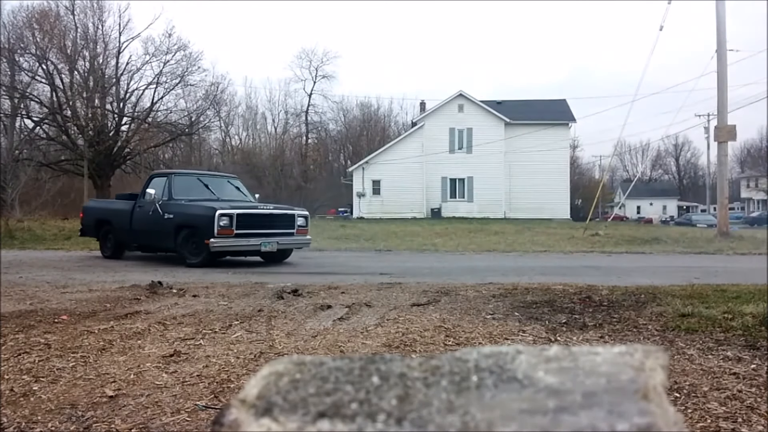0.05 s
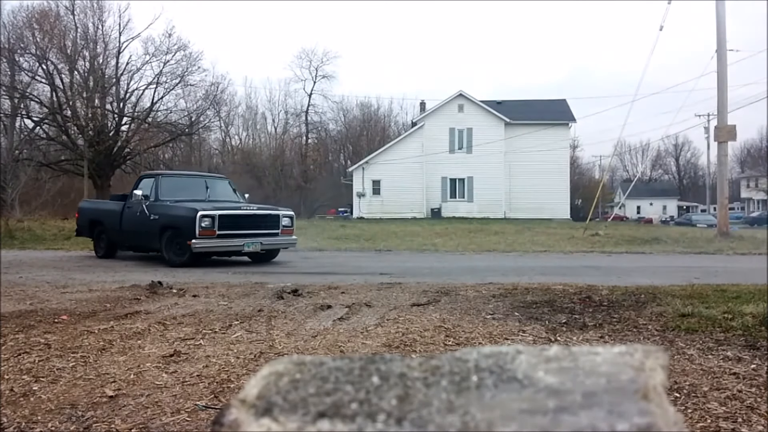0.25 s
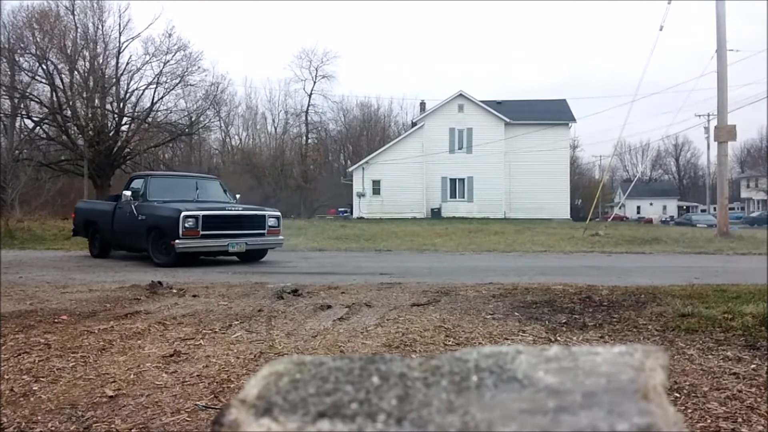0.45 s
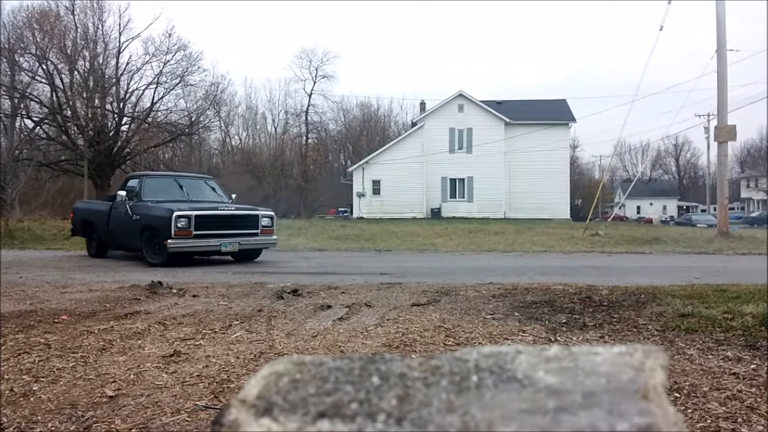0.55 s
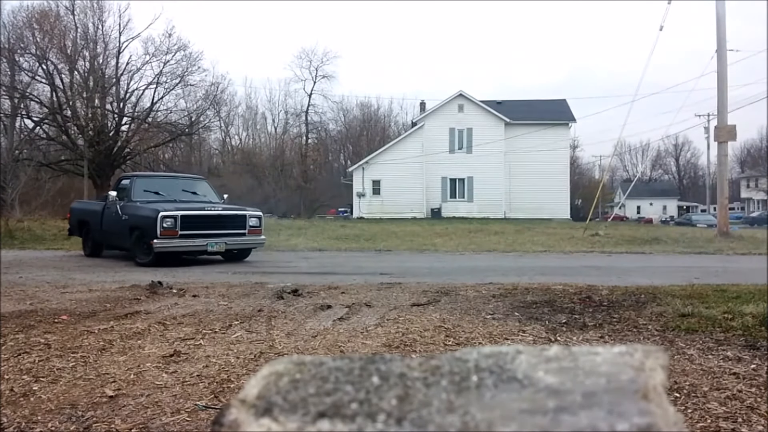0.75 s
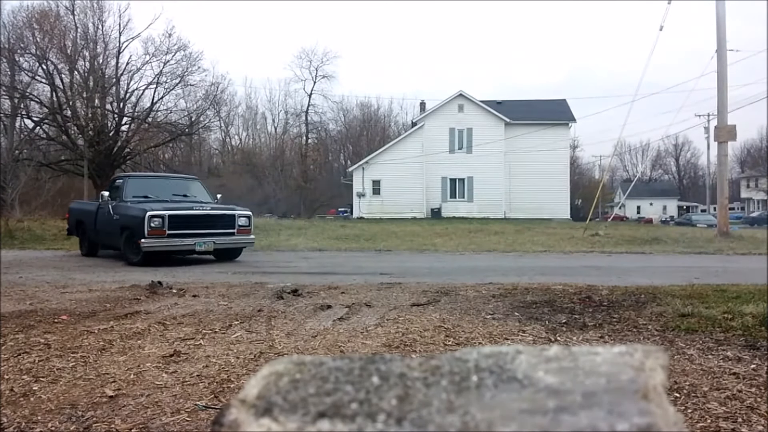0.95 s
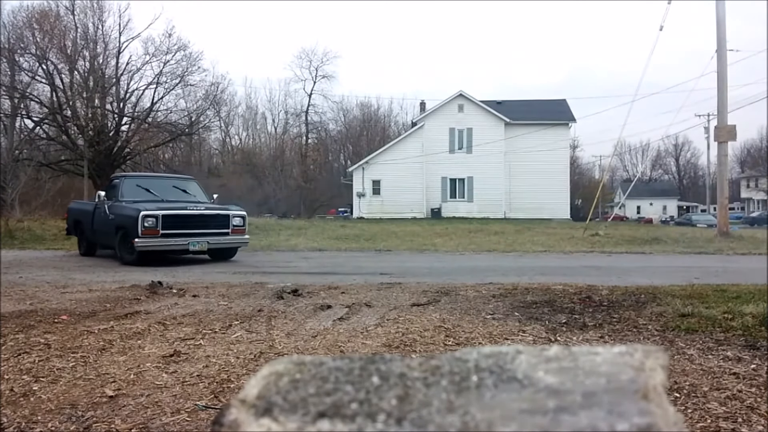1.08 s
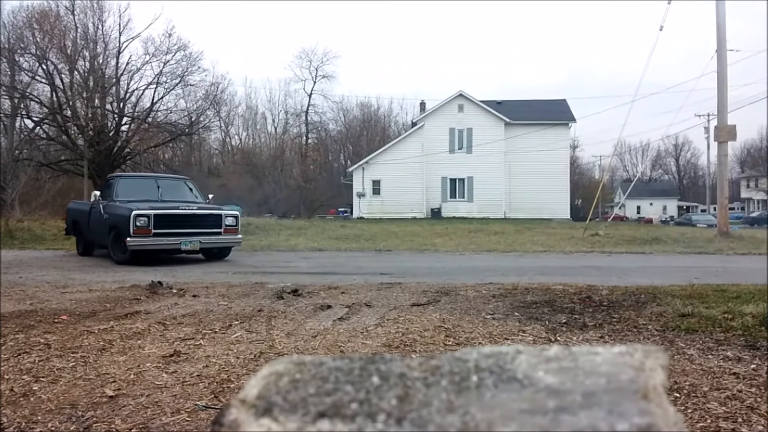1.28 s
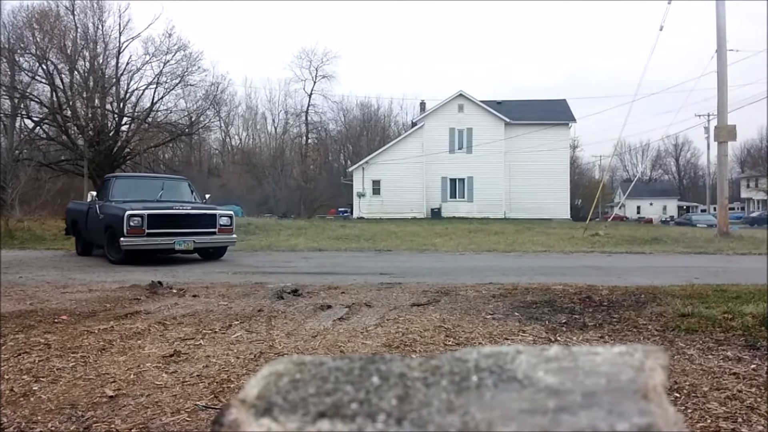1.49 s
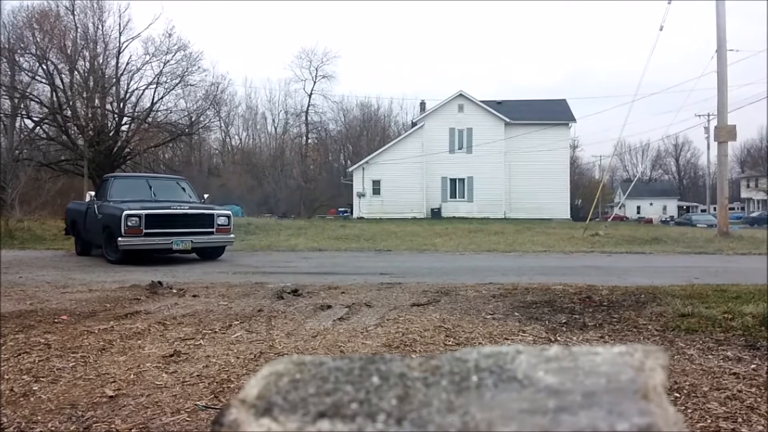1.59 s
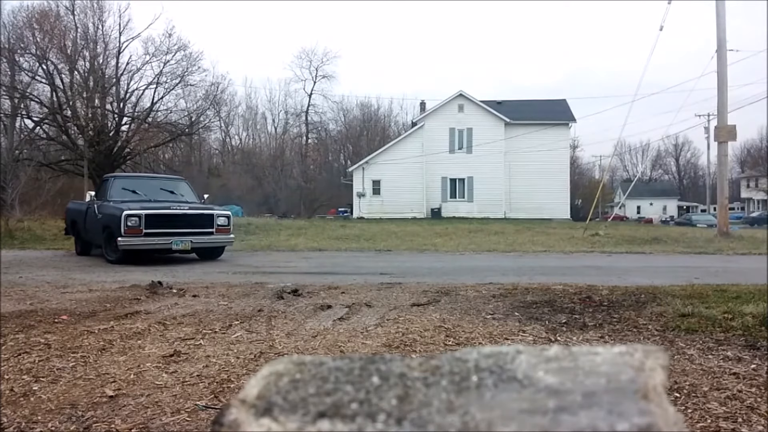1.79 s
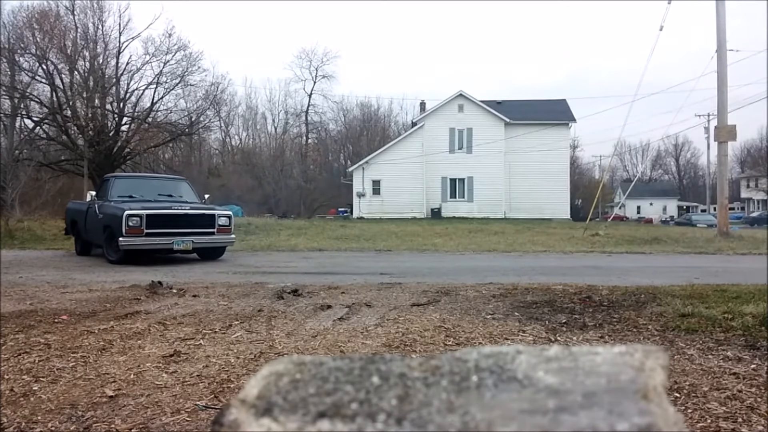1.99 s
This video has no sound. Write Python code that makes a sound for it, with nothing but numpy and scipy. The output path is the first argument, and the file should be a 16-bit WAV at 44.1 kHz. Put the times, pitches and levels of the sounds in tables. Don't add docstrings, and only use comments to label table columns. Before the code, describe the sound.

Lumpy low truck engine rumble through open pipes, with irregular louder barks, belt chirps, loose panel rattles and metal ticks; outdoor stereo pickup at a distance, left-weighted, with a dull clunk and wind buffet late on.

```python
import sys
import numpy as np
from scipy import signal
from scipy.fft import rfft, irfft, next_fast_len
from scipy.io import wavfile
from scipy.ndimage import uniform_filter1d, map_coordinates

SR = 44100
rng = np.random.default_rng(int(sys.argv[2]) if len(sys.argv) > 2 else 0)


def to_wav(s):
    ch = np.atleast_2d(s).T
    pcm = np.round(np.clip(ch, -1, 1) * 32767)
    wavfile.write(sys.argv[1], SR, pcm.astype(np.int16))


def decibels_to_gain(level_db):
    exponent = np.asarray(level_db, float) / 20
    return 10 ** exponent


N = 89875

# [t/s, level/dB]
LOUD_FIRINGS = [(-0.0177, 4.6), (0.0168, 11.5), (0.0939, 6.4), (0.1175, -2.1), (0.1329, -2.6),
                (0.1669, 11.4), (0.2122, 11.8), (0.2263, 4.3), (0.2902, 2.1), (0.3166, 7.0), (0.3478, 1.8),
                (0.3633, 10.2), (0.4086, 12.8), (0.4222, -1.6), (0.4857, 6.5), (0.5224, 2.3), (0.5592, 8.8),
                (0.5791, 2.2), (0.6045, 10.3), (0.6544, 0.4), (0.707, 1.3), (0.7524, 11.8), (0.7741, 5.4),
                (0.7964, 15.0), (0.8195, 4.0), (0.8313, 0.7), (0.854, 6.7), (0.8766, -1.2), (0.8948, 1.0),
                (0.9383, 7.6), (0.981, 5.1), (0.9973, 1.7), (1.0154, 4.9), (1.0304, -1.7), (1.1143, 10.7),
                (1.1315, -1.3), (1.171, 7.0), (1.2, 0.7), (1.2299, 4.5), (1.2676, 10.1), (1.2857, 3.9),
                (1.3252, 8.2), (1.3542, -2.4), (1.3837, 2.6), (1.4218, 7.3), (1.4385, -0.5), (1.5143, -0.4),
                (1.5488, -3.0), (1.5841, 0.5), (1.6281, 9.2), (1.7315, 7.6), (1.7814, 7.2), (1.8168, 1.4),
                (1.8576, 2.8), (1.9075, 2.7), (1.9338, 3.3), (1.9814, 6.6), (2.0168, 4.8)]
CYCLE_STARTS = [-.18, .017, .212, .409, .605, .796, .96, 1.114, 1.268, 1.422, 1.59, 1.765, 1.945, 2.13]
CYLINDER_LEVELS = [-14, 0, -2, -14, -1, 1, -14, -2]
# [f/Hz, width/Hz, level/dB]
PIPE_RESONANCES = [(82.7, 7.1, 0), (113.8, 14, 1.7), (188, 14, -8), (255, 25, -7), (306, 20, -3)]
# [t/s, peak level/dB, f/Hz]
EXHAUST_BURBLES = [(.10, -47, 263), (.19, -29, 278), (.265, -36, 235), (.33, -40, 208.5),
                   (.405, -42.5, 309), (.53, -38, 383), (.60, -36.5, 275.5), (.675, -39, 254.5),
                   (.745, -37, 347), (.815, -37.5, 386), (.95, -49.5, 284.7), (1.013, -40, 301),
                   (1.11, -32, 343.4), (1.276, -42, 306), (1.545, -32.5, 210), (1.607, -35, 235),
                   (1.678, -34, 468), (1.934, -43, 231), (1.075, -22, 55), (1.29, -33, 50), (1.39, -33, 52)]

# [t/s, level/dB]
CLATTER_LEVEL = [(0, -36.5), (.45, -42.5), (.63, -39), (1.0, -40.5), (1.27, -41), (1.58, -41.5),
                 (1.7, -43.5), (1.87, -43), (2.04, -45.5)]
# [t/s, level/dB]
GRIT_LEVEL = [(0, -50), (.14, -54.5), (.55, -56), (.63, -47), (.72, -53.5), (.92, -57), (1.08, -58),
              (1.13, -49), (1.28, -53), (1.54, -60.5), (1.66, -65.5), (1.72, -52.5), (2.04, -60.5)]
# [f/Hz, level per Hz/dB]
ROAR_COLOUR = [(15, -36), (28, -8), (45, -20), (100, -2.5), (150, -5), (210, -20), (400, -22.5),
               (800, -33.5), (1400, -39), (2200, -120)]
# [f/Hz, level per Hz/dB]
CLATTER_COLOUR = [(240, -19.5), (450, -7), (740, -7), (1220, -2), (1500, -4), (2400, -5), (3200, -9),
                  (3800, -5.5), (5200, -31.5), (7000, -23), (11000, -120)]
# [f/Hz, level per Hz/dB]
HISS_COLOUR = [(3000, -47), (4800, 9), (6100, -1), (7600, 3), (9500, -1), (11500, -9.5), (13500, -14),
               (15700, -45)]
# [f/Hz, likeness 0..1]
LEFT_RIGHT_LIKENESS = [(30, 0.25), (90, 0.95), (400, 0.61), (1500, 0.52), (3000, 0.4), (5000, 0.14),
                       (9000, 0.097)]
# [t/s, share 0..1]
GROUND_ECHO = [(.85, 0), (1.02, .6), (1.15, 0), (1.42, 0), (1.48, .85), (1.69, .9), (1.72, 0)]

# [t/s, peak level/dB, f/Hz]
LOW_RUBS = [(0.163, -32, 1192), (0.2379, -43, 1235), (0.3601, -29, 1166), (0.4349, -38, 1210),
            (0.4818, -42.5, 1195), (0.6125, -32.5, 1227), (0.7562, -28.5, 1205), (0.843, -41.5, 1229),
            (0.9383, -34.5, 1243), (1.0296, -39, 1228), (1.1707, -35.5, 1253), (1.261, -34, 1208),
            (1.5838, -38.5, 1213), (1.68, -41.5, 1214), (1.78, -40, 1190), (1.86, -39.5, 1282),
            (1.895, -38.5, 1235)]
MID_RUBS = [(0.268, -34.5, 2753), (0.46, -29, 2807), (0.56, -36, 2860), (0.618, -32, 2938),
            (0.7285, -45, 2780), (0.7968, -30, 2737), (0.8825, -30, 2680), (0.9497, -38, 2112),
            (1.0266, -39, 2170), (1.0974, -31.5, 2400), (1.1294, -30.5, 2265), (1.1982, -33.5, 2309),
            (1.3242, -32.5, 3010), (1.3573, -35.5, 2460), (1.3967, -34.5, 2747), (1.4936, -32.5, 2833),
            (1.5748, -30, 2594), (1.6841, -40, 2240), (1.7659, -36.5, 2710), (1.8018, -33.5, 2297),
            (1.8332, -39, 2757), (1.928, -35, 2960), (2.0188, -32.5, 2880)]
HIGH_RUBS = [(0.1695, -31.5, 3515), (.40, -41.5, 3500), (0.4614, -34, 3670), (0.5482, -31, 3770),
             (0.619, -34, 3377), (0.7257, -35.5, 3585), (0.9837, -47, 3700), (1.0934, -36.5, 3400),
             (1.1907, -37.5, 3323), (1.3992, -29, 3628), (1.4955, -34, 3530), (1.6711, -36.5, 3810),
             (1.7594, -35, 3610), (1.941, -50, 3600), (2.0213, -50, 3510)]
# [t/s, peak level/dB, f/Hz]
PANEL_RATTLES = [(0.022, -36, 684), (0.067, -35, 623), (0.143, -44, 608), (0.284, -32.5, 777),
                 (0.413, -29, 771), (0.468, -28, 883), (0.721, -47, 1036), (0.858, -34, 960),
                 (1.056, -33, 883), (1.42, -24.5, 707), (1.54, -32, 603), (1.715, -36, 575)]
PANEL_BUZZES = [(0.1077, -34.5, 1817), (0.161, -34, 1710), (0.2519, -30, 1385), (0.386, -32, 1900),
                (0.4676, -27.5, 1329), (0.6387, -28.5, 1987), (0.7346, -28.5, 1570), (0.9512, -44.5, 1286),
                (1.1482, -36, 1393), (1.2636, -29.5, 1508), (1.414, -38, 1914), (1.754, -34.5, 1478),
                (1.8602, -32, 1319), (1.9023, -35.5, 1404)]
# [t/s, length/s, level/dB, start f/Hz, end f/Hz]
BELT_SLIPS = [
    (.17, .17, -40, 3650, 3400),
    (.325, .068, -34, 3400, 3260),
    (.275, .044, -41, 3600, 3750),
    (1.772, .13, -43, 3700, 4000),
    (.447, .014, -60, 15400, 15400),
]
# [t/s, peak level/dB]
GEARBOX_BLOWS = [
    (1.4185, -26),
    (1.428, -23.5),
    (1.437, -31.5),
    (1.446, -27),
]
# [f/Hz, level/dB, time to die by 60 dB/s]
GEARBOX_RINGING = [(310, -6, .08), (575, -8, .04), (690, -4, .045), (770, -7, .03), (835, -4, .04),
                   (965, -8, .035)]
# [t/s, peak level/dB, f/Hz]
LINKAGE_TICKS = [(.17, -31, 3940), (.264, -34, 4470), (.468, -27, 990), (.6188, -18.5, 3900),
                 (.6407, -26, 4000), (.653, -30, 3800), (.68, -25, 4200), (.787, -35, 4530),
                 (.985, -36, 3500), (1.099, -33, 5000), (1.129, -29, 2900), (1.4945, -32, 3100),
                 (1.575, -29, 2900), (2.021, -29, 3000)]

# [t/s, peak level/dB, f/Hz]
GUST_PUSHES = [
    (1.6915, -4, 195),
    (1.697, -4, 90),
    (1.7075, -13, 110),
    (1.7174, -6, 165),
    (1.7362, -5, 92),
]
# [f/Hz, level/dB]
LEFT_OVER_RIGHT = [(60, 0), (160, 7), (350, 3), (700, 5), (1400, 4.5), (3200, 9.5), (5000, 9), (7500, 5)]


def unit(x):
    return x / np.sqrt(np.mean(x ** 2) + 1e-20)


def along(points, hz):
    f, v = np.transpose(points)
    return np.interp(np.log(hz + 1), np.log(f + 1), v)


def over_time(points):
    return np.interp(np.arange(N) / SR, *np.transpose(points))


def wobble(rate):
    knots = rng.standard_normal(int(N * rate / SR) + 4)
    return map_coordinates(knots, [np.arange(N) * rate / SR])


def filtered(x, response):
    m = next_fast_len(x.shape[-1] + SR)
    return irfft(rfft(x, m) * response(np.fft.rfftfreq(m, 1 / SR)), m)[..., :x.shape[-1]]


def peak(f, hz, width):
    return 1j * f * width / (hz * hz - f * f + 1j * f * width)


def blank(seconds):
    return np.zeros(N + SR), np.arange(int(seconds * SR)) / SR


def lay(track, s, sound):
    track[max(round(s * SR), 0):][:len(sound)] += sound


def firings():
    k = np.arange(8 * (len(CYCLE_STARTS) - 1))
    even = np.interp(k / 8, np.arange(len(CYCLE_STARTS)), CYCLE_STARTS)
    return even + .0015 * rng.standard_normal(len(k))


def exhaust(times):
    quiet_db, scatter_db, bark_db = -52, 2, -39.4
    hump_hz, hump_width_hz = 79, 80
    far_delay_s, far_share = .0272, .49
    lead = SR // 4
    pulses = np.zeros(N + 2 * lead)
    scatter = scatter_db * rng.standard_normal(len(times))
    size = decibels_to_gain(quiet_db + np.resize(CYLINDER_LEVELS, len(times)) + scatter)
    np.add.at(pulses, (times * SR).astype(int) + lead, size)
    for s, db in LOUD_FIRINGS:
        pulses[round(s * SR) + lead] += decibels_to_gain(db + bark_db)

    def pipes(f):
        ringing = sum(decibels_to_gain(db) * peak(f, hz, width) for hz, width, db in PIPE_RESONANCES)
        both_pipes = 1 + far_share * np.exp(-2j * np.pi * f * far_delay_s)
        return -2000 * ringing * peak(f, hump_hz, hump_width_hz) ** 2 * both_pipes

    return filtered(pulses, pipes)[lead:lead + N]


def rush(colour, patchy_db):
    z = signal.stft(rng.standard_normal((2, N)), nperseg=256)[2]
    patches = uniform_filter1d(rng.standard_normal(z.shape[1:]), size=2, axis=0)
    patches = uniform_filter1d(patches, size=10, axis=1)
    pair = signal.istft(z * decibels_to_gain(patchy_db * unit(patches)), nperseg=256)[1][:, :N]

    def spread(hz):
        angle = np.arccos(np.clip(along(LEFT_RIGHT_LIKENESS, hz), -1, 1)) / 2
        return decibels_to_gain(along(colour, hz)) * [np.cos(angle), np.sin(angle)]

    mid, side = filtered(pair, spread)
    return unit(np.array([mid + side, mid - side]))


def machinery(times):
    puffs = np.zeros(N)
    inside = times[(times > 0) & (times < N / SR)]
    puffs[(inside * SR).astype(int)] = decibels_to_gain(6 * rng.standard_normal(len(inside)))
    fade = np.exp(-np.arange(1500) / (0.036 * SR))
    gate = 1 + 0.14 * np.convolve(puffs, fade)[:N]
    shared = 1.3 * wobble(10.2)
    roar = decibels_to_gain(-39 + 1.2 * wobble(12)) * unit(gate * rush(ROAR_COLOUR, patchy_db=2.5))
    clatter = decibels_to_gain(over_time(CLATTER_LEVEL) + shared) * unit(gate * rush(CLATTER_COLOUR, patchy_db=2.5))
    echo = filtered(clatter, lambda f: peak(f, 1500, 600))
    clatter = clatter - over_time(GROUND_ECHO) * echo
    hiss_db = over_time(GRIT_LEVEL) + .4 * shared + 1.1 * wobble(15)
    hiss = decibels_to_gain(hiss_db) * rush(HISS_COLOUR, patchy_db=1.8)
    return roar + clatter + hiss


def squeaks(rows, rise_s, t60_s, rough, gain_db):
    out, t = blank(.2)
    for s, db, hz in rows:
        drift = np.cumsum(uniform_filter1d(rng.standard_normal(len(t)), size=24)) * rough * 1.2
        shake = decibels_to_gain(2.86 * map_coordinates(rng.standard_normal(40), [t * 150]))
        swell = np.minimum(t / rise_s, 1) ** 2
        decay = decibels_to_gain(-60 * np.maximum(t - rise_s, 0) / t60_s)
        tone = np.sin(2 * np.pi * hz * t + drift)
        lay(out, s - .6 * rise_s, decibels_to_gain(db + gain_db) * swell * decay * shake * tone)
    return out[:N]


def belt_slips():
    out, _ = blank(0)
    for s, length, db, from_hz, to_hz in BELT_SLIPS:
        n = round(length * SR)
        waver = .06 * uniform_filter1d(rng.standard_normal(SR), size=24)[:n]
        phase = np.cumsum(2 * np.pi * np.linspace(from_hz, to_hz, n) / SR + waver)
        lay(out, s, decibels_to_gain(db) * np.sqrt(np.hanning(n)) * np.sin(phase))
    return out[:N]


def gearbox_clunk():
    out, t = blank(1 / 3)
    for s, db in GEARBOX_BLOWS:
        ring = np.zeros(len(t))
        for hz, level, t60 in GEARBOX_RINGING:
            ring += decibels_to_gain(level + rng.standard_normal() - 60 * t / t60) * np.sin(2 * np.pi * hz * t)
        lay(out, s, decibels_to_gain(db - 3) * ring * (1 - np.exp(-t / .0008)))
    return out[:N]


def ticks():
    out, t = blank(.1)
    for s, db, hz in LINKAGE_TICKS:
        crack = unit(filtered(rng.standard_normal(len(t)), lambda f: peak(f, hz, 2600) ** 4))
        lay(out, s, decibels_to_gain(db - 60 * t / .022) * crack * (1 - np.exp(-t / .001)))
    return out[:N]


def gust():
    out, t = blank(.25)
    for s, db, hz in GUST_PUSHES:
        push = decibels_to_gain(db - 60 * t * hz / 11) * np.sin(2 * np.pi * hz * t)
        lay(out, s, push * (1 - np.exp(-t / .0014)))
    return out[:N]


def yard(x):
    t = np.arange(SR // 4) / SR
    scatter = rng.standard_normal((2, len(t))) * decibels_to_gain(-60 * t / .2)
    tail = filtered(scatter, lambda f: 1 / (1 + 1j * f / 5000))
    tail = tail / np.linalg.norm(tail, axis=1, keepdims=True)
    return signal.fftconvolve(x[None], tail, axes=1)[:, :N]


def to_ports(x):
    lead_s, side = .0001, np.array([[1], [-1]])

    def path(f):
        return decibels_to_gain(side * along(LEFT_OVER_RIGHT, f) / 2) * np.exp(1j * np.pi * f * lead_s * side)

    return filtered(x, path)


def scene():
    times = firings()
    low = exhaust(times) + squeaks(EXHAUST_BURBLES, .015, 0.078, 0.042, gain_db=1.5)
    parts = ticks() + belt_slips() + gearbox_clunk()
    parts = parts + squeaks(LOW_RUBS, .02, .13, .04, gain_db=-2)
    parts = parts + squeaks(MID_RUBS, .011, .1, .12, gain_db=-2)
    parts = parts + squeaks(HIGH_RUBS, .012, .2, .09, gain_db=-2)
    parts = parts + squeaks(PANEL_RATTLES, .008, 0.2, .15, gain_db=-7.5)
    parts = parts + squeaks(PANEL_BUZZES, .01, 0.21, .2, gain_db=-7.5)
    echoes = decibels_to_gain(-11) * yard(parts + .4 * low)
    truck = low + parts + echoes + machinery(times)
    left_only = np.array([[1], [0]])
    return gust() * left_only + to_ports(truck)


def roll_off(x):
    return signal.sosfilt(signal.butter(12, 15720, fs=SR, output="sos"), x)


def record(dry):
    return roll_off(dry)


dry = scene()
out = record(dry)
to_wav(out)
```